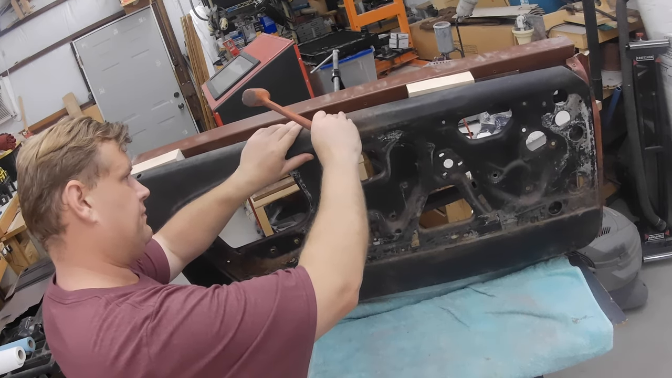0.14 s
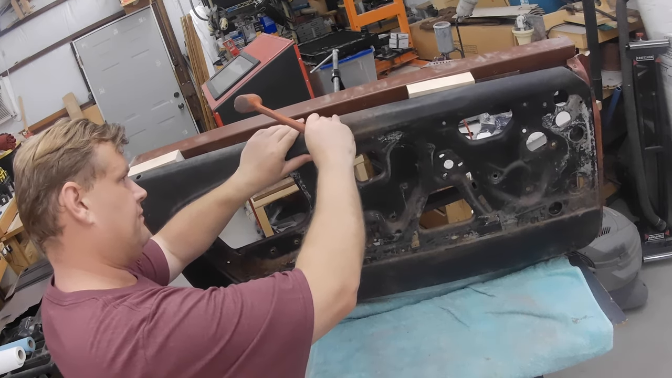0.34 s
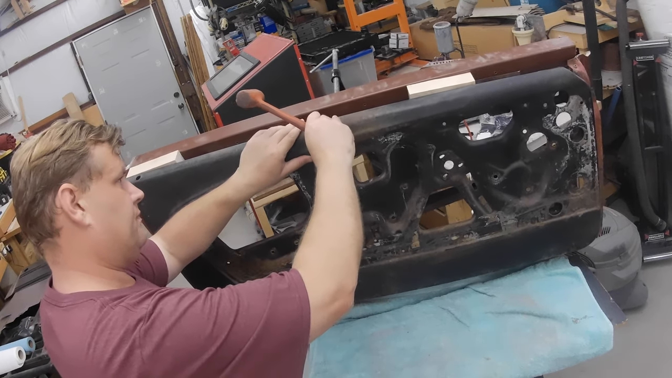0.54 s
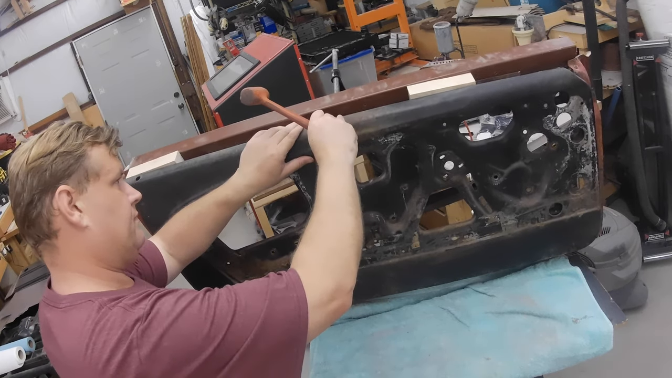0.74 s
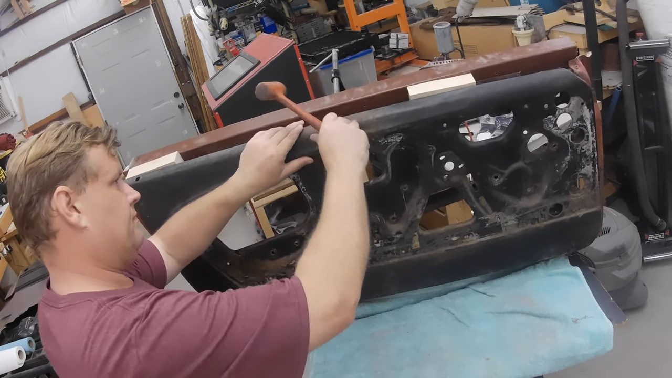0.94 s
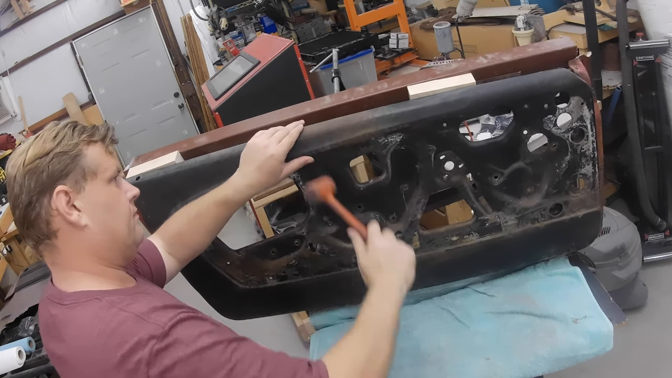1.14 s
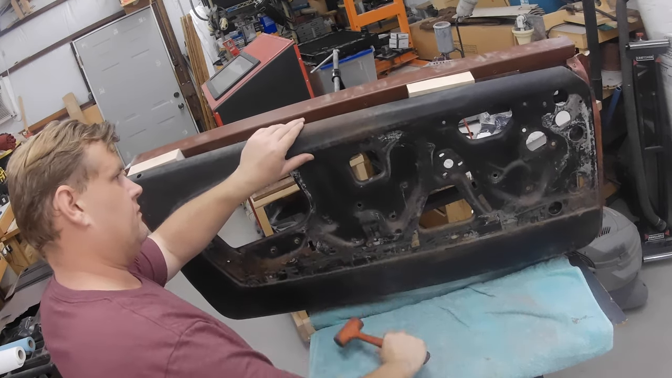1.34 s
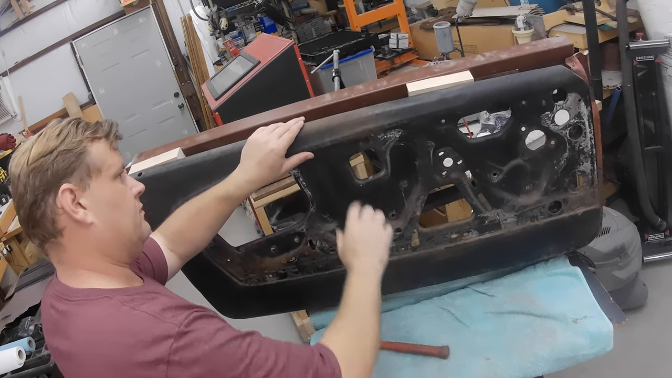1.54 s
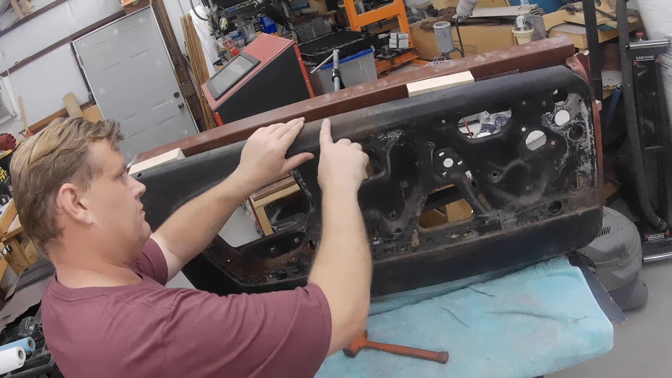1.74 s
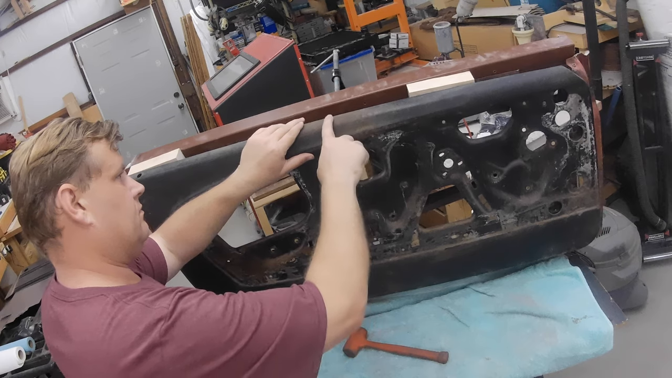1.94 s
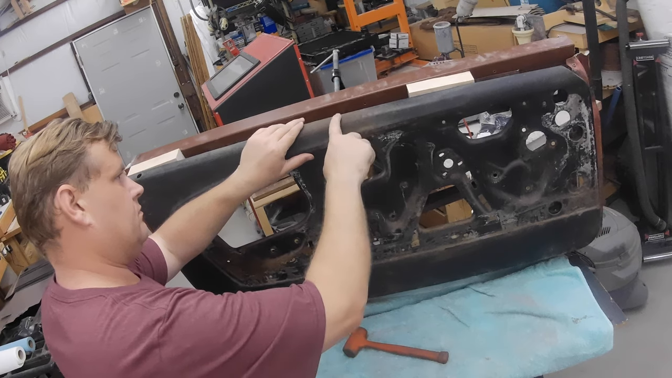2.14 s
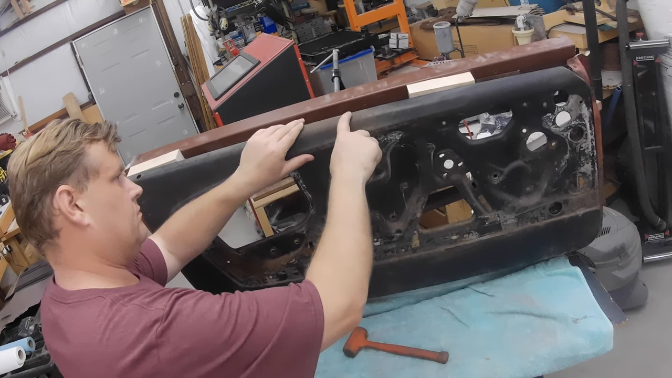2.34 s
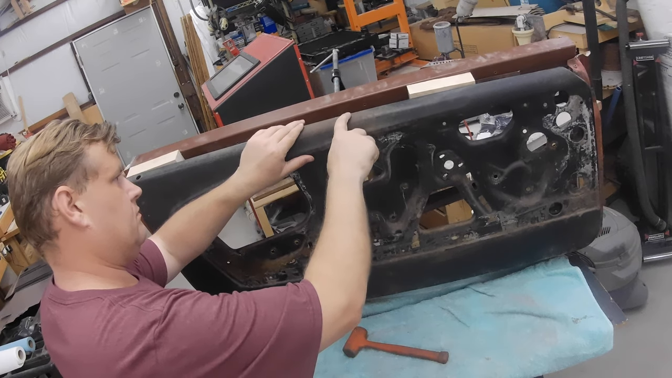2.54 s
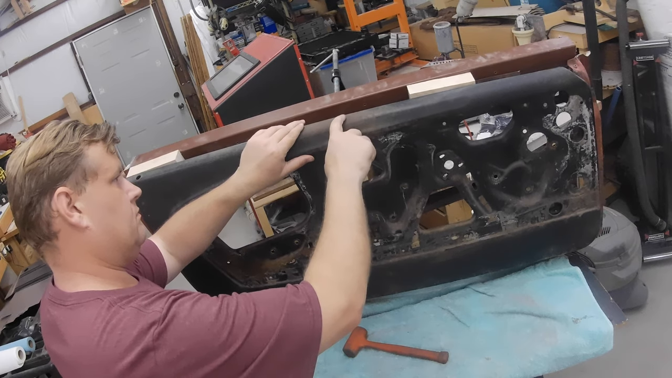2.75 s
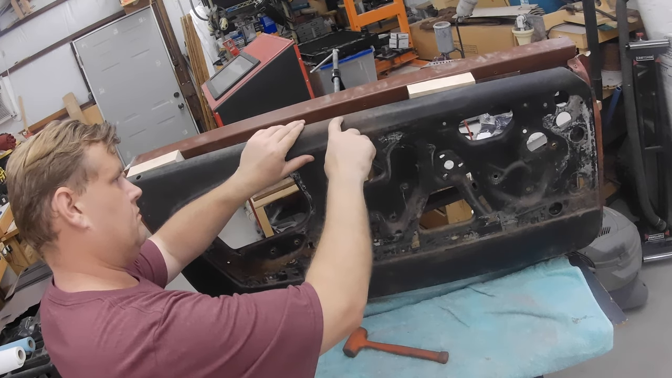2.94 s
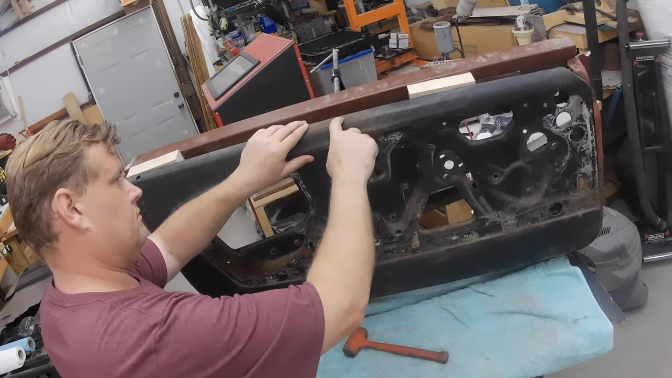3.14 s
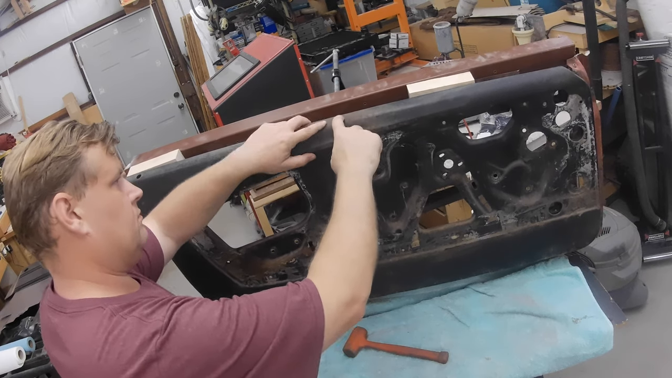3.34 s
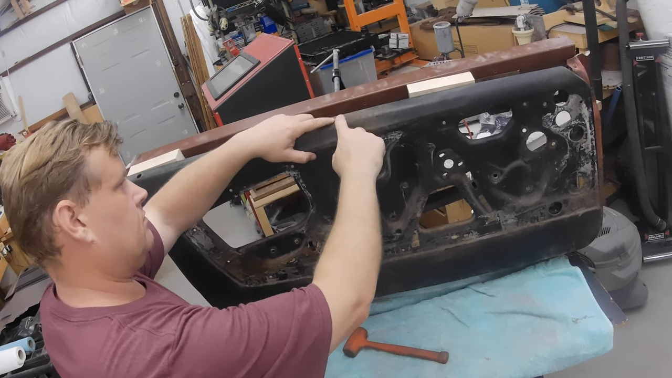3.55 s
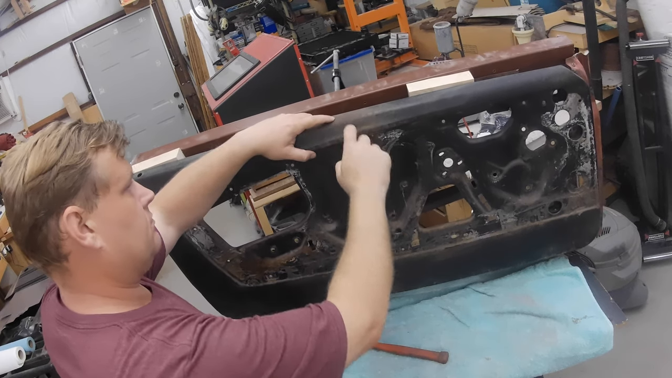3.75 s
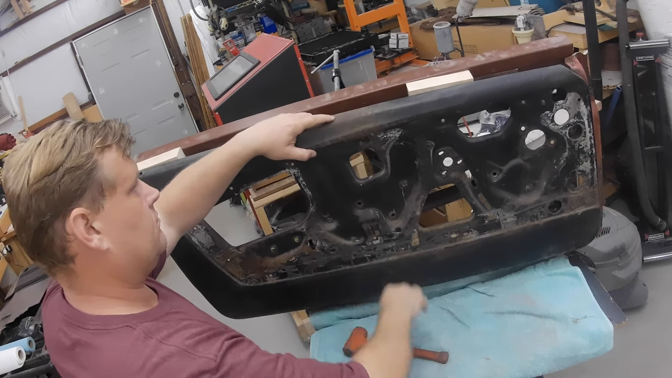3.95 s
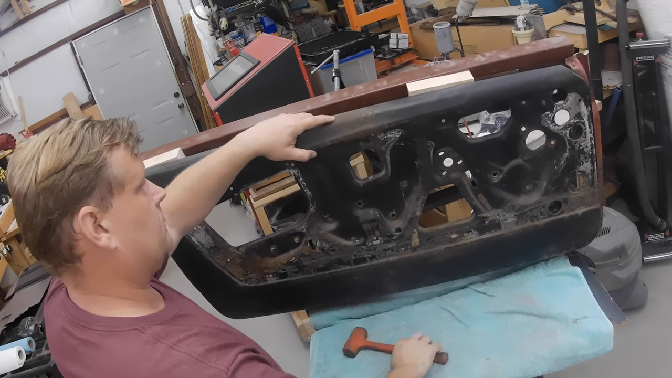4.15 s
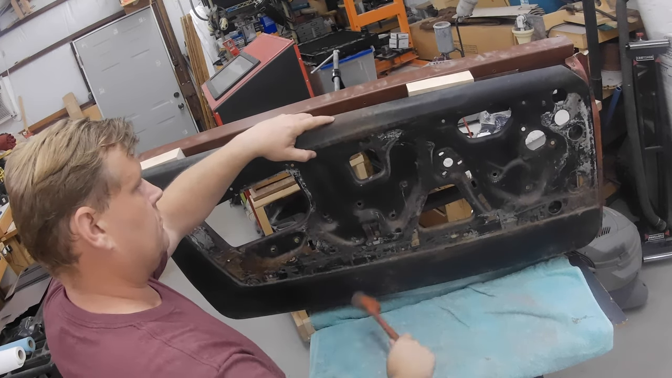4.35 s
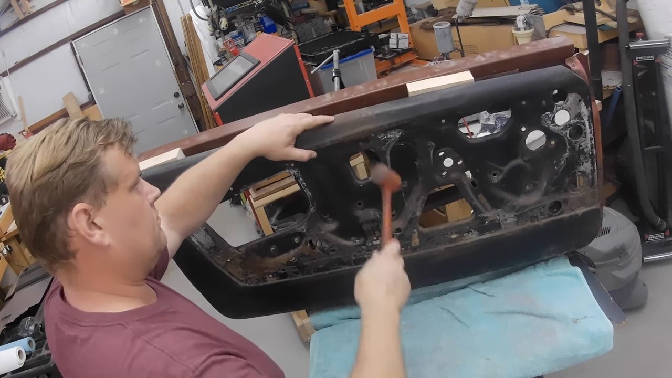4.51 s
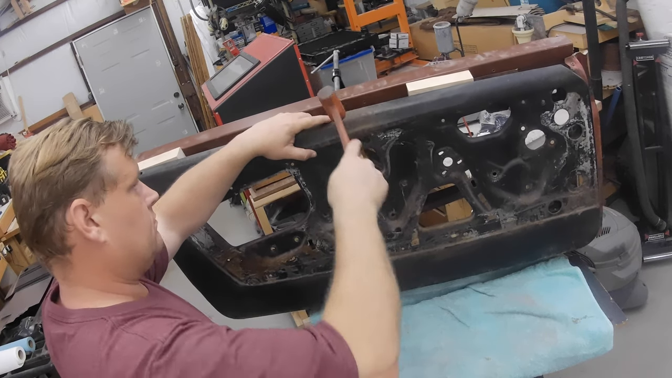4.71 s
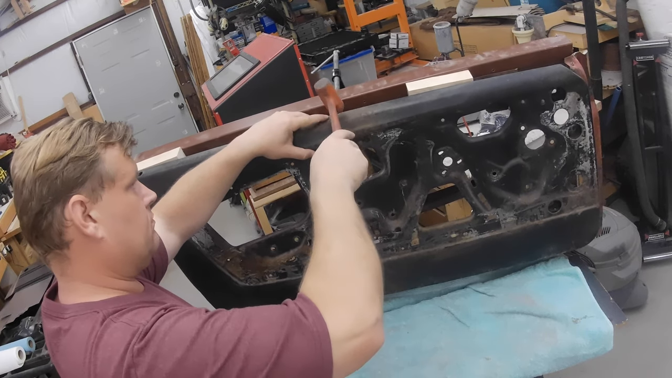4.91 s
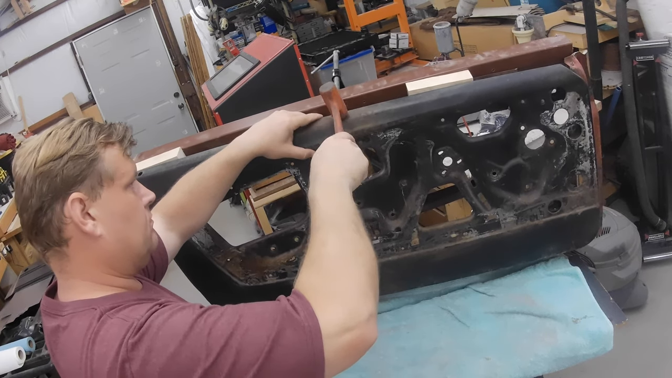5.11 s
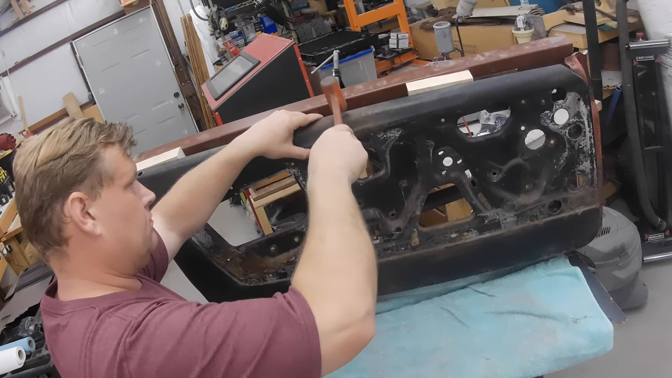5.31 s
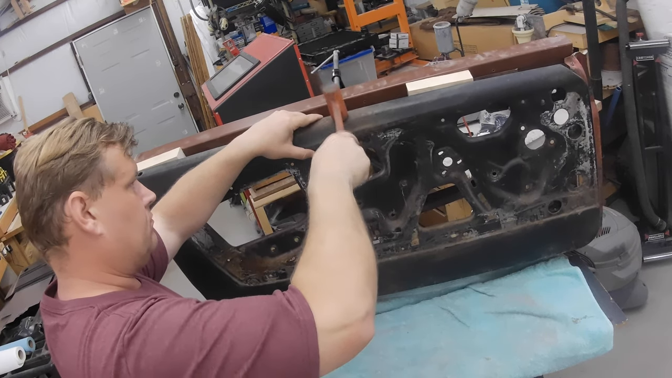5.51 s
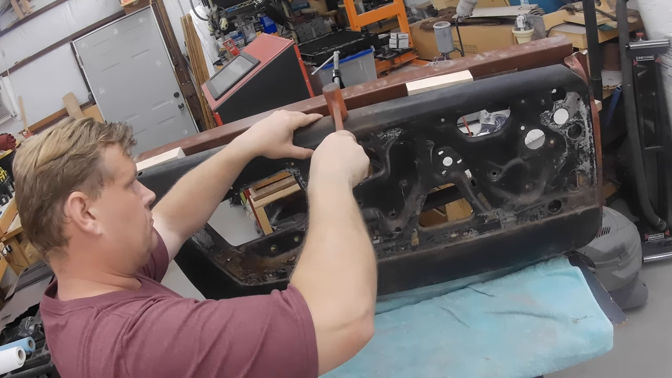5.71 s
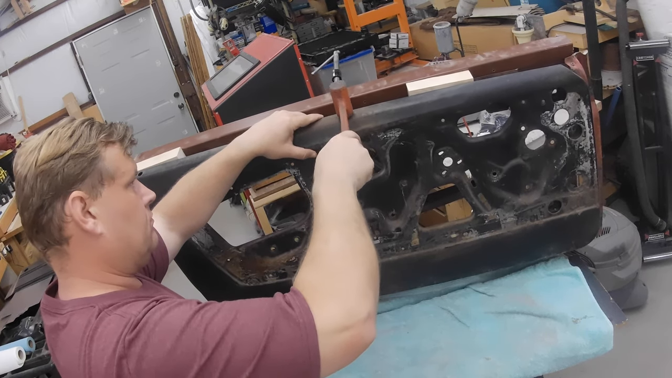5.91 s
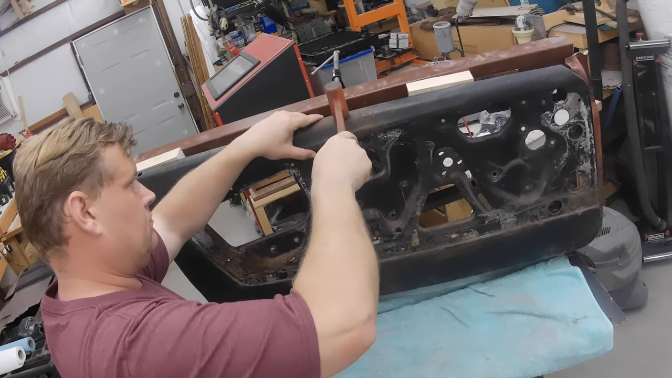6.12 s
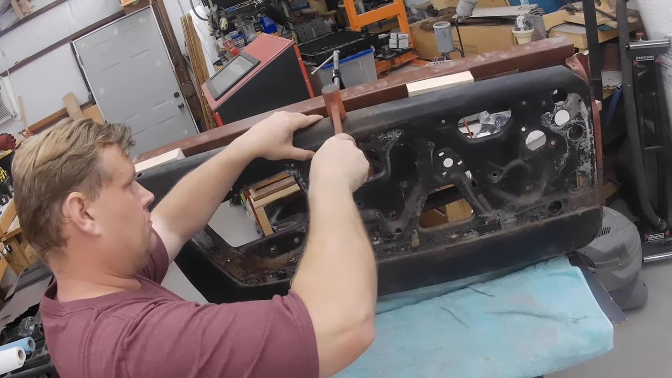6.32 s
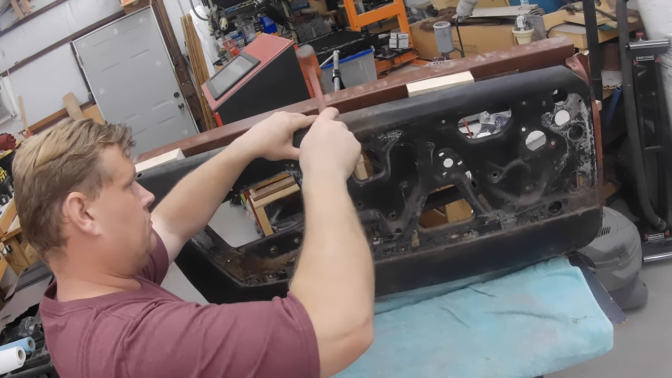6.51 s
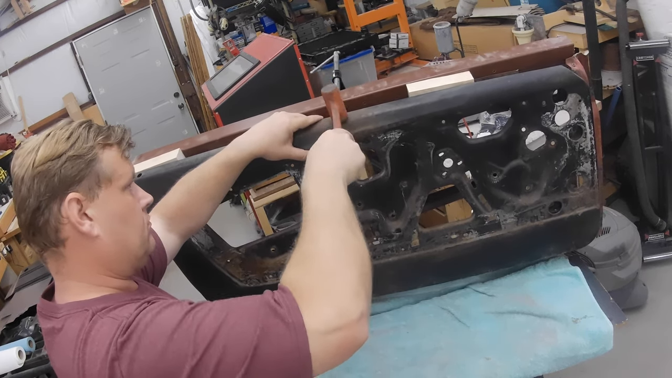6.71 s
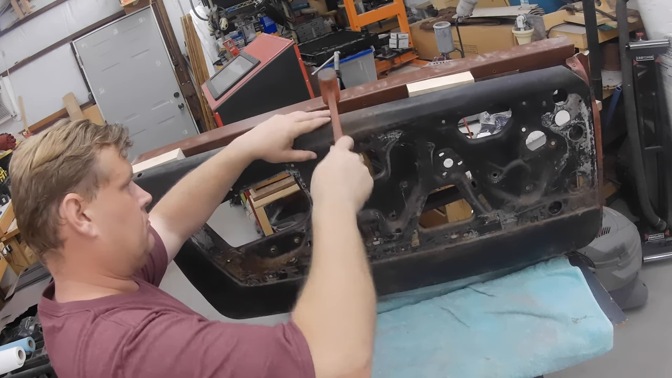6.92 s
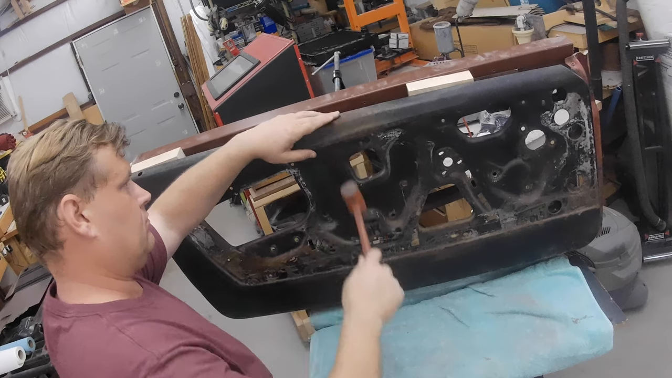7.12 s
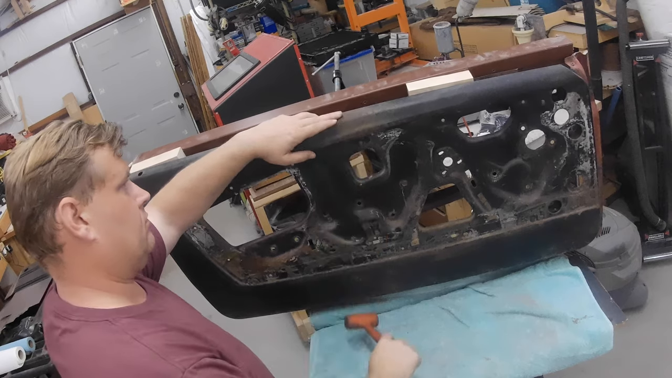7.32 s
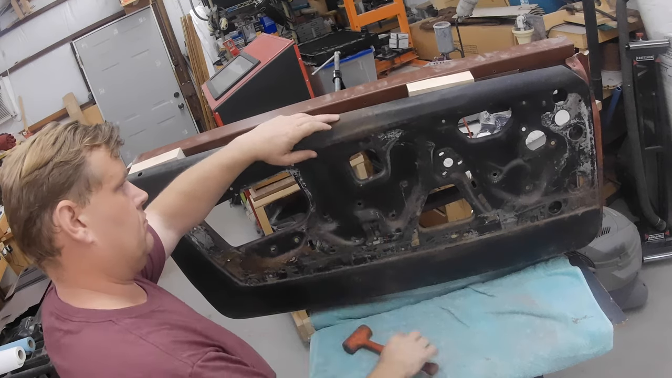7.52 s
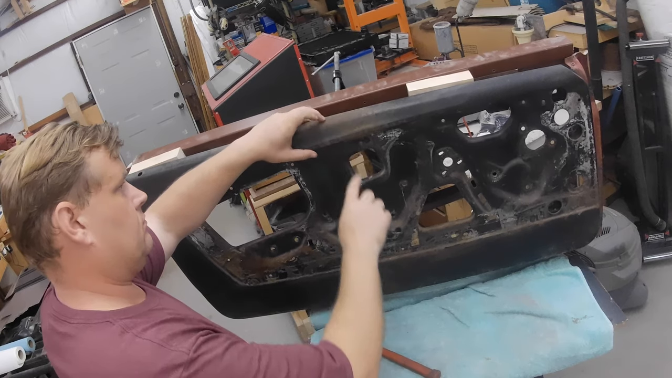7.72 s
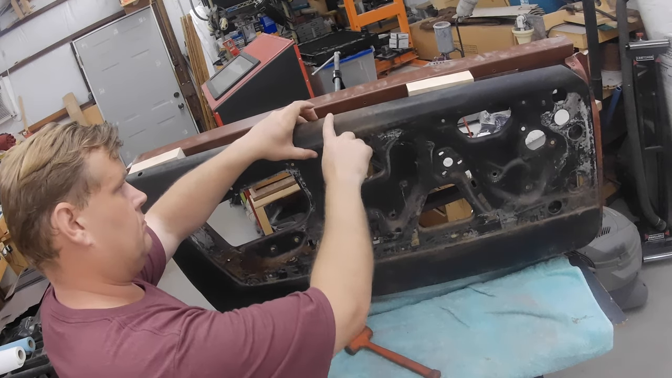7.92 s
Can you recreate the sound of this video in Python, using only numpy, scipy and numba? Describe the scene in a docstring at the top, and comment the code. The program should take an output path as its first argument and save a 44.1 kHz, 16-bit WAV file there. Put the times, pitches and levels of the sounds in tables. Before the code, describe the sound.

After five quiet seconds of fan hum and faint bench knocks, a hammer bangs hollow sheet steel twice, harshly overloading the close microphone.

```python
"""A hammer strikes a steel door panel twice in a garage workshop, close enough to overload the microphone.
The panel is a sum of decaying modes over a wash of decaying noise bands, and the room adds a weaker tail.
Light taps on it are softer, duller blows; knocks shake the resonances of a bench, and finger slides are
swells of band noise. A fan drones with blade and mains tones over rushing air, shaped from noise,
and a thin high hiss, a narrow noise band, throbs above it."""
import sys
import numpy as np
from scipy import signal
from scipy.fft import rfft, irfft
from scipy.io import wavfile
from scipy.ndimage import uniform_filter1d
from numba import njit

SR = 44100
rng = np.random.default_rng(int(sys.argv[2]) if len(sys.argv) > 2 else 0)


def field_ratio(decibels):
    """Amplitude ratio for a level in dB (20 dB per decade); scalars and array-likes work."""
    return 10 ** (np.asarray(decibels, dtype=float) / 20)


def output_pcm(signal):
    """Save a mono or channel-first signal as 16-bit PCM at the path in sys.argv[1].

    Samples are clipped to [-1, 1] before scaling.
    """
    pcm = np.clip(np.atleast_2d(signal).T, -1, 1) * 32767
    wavfile.write(sys.argv[1], SR, np.round(pcm).astype(np.int16))


N = 351168
T = np.arange(N) / SR


def noise():
    """White noise: equal mean power at every frequency."""
    return rng.standard_normal(N)


def unit(x):
    """Normalisation to an rms of 1."""
    return x / np.sqrt(np.mean(x ** 2))


def band(x, hz, width_hz):
    """Band-pass filtering about a geometric centre."""
    edges = np.sqrt(hz ** 2 + width_hz ** 2 / 4) + np.array([-0.5, 0.5]) * width_hz
    return signal.sosfilt(signal.butter(2, edges, "bandpass", fs=SR, output="sos"), x)


def walk(rate_hz):
    """Random wander: noise held in steps, smoothed twice, with a spread of about 1."""
    step = int(SR / rate_hz)
    steps = np.repeat(rng.standard_normal(N // step + 1), step)
    return unit(uniform_filter1d(uniform_filter1d(steps, step), step)[:N])


def fade(t, t60):
    """Exponential decay: 60 dB in t60 seconds."""
    return field_ratio(-60 * t / t60)


def add(out, start_s, x):
    """Superposition of x on out from start_s."""
    i = int(start_s * SR)
    out[i:i + len(x)] += x[:N - i]


# Hammer and lighter contacts on the panel. Each row: start in seconds, strength in dB,
# contact brightness (low-pass corner) in Hz, extra level of the low modes in dB.
PANEL_BLOWS = [(5.221, -37, 904, 0.5), (5.245, -33, 421, 7), (5.285, -43, 700, 3.5),
               (5.5848, 4, 9020, -0.4), (6.332, -46, 905, 10.5), (6.679, 4, 8990, 2.5)]


def panel():
    """Impact excitation: each blow rings modes and wash, and a softer contact excites less treble."""
    out, t = np.zeros(N), T[:int(1.5 * SR)]
    thin_hz = rng.uniform(1706, 7936, size=160)
    # the first waves are stronger until the skin of the door has shared them with its frame
    first_db, first_t60_s, rise_s = 5, 0.12, 0.00037
    for start_s, strength_db, bright_hz, low_db in PANEL_BLOWS:
        ring = named_modes(t, low_db)
        add(ring, 0, wash(t[:SR]))
        add(ring, 0, thin_sines(t[:SR], thin_hz))
        onset = 1 - np.exp(-t / rise_s)
        ring = ring * onset * (1 + field_ratio(first_db) * fade(t, first_t60_s))
        contact = signal.lfilter(*signal.butter(2, bright_hz, fs=SR), ring)
        add(out, start_s, field_ratio(strength_db) * contact)
    return out + room_tail(out)


# Separate modes of the panel. Each row: frequency in Hz, relative level in dB, decay time t60 in seconds.
PANEL_MODES = [(211.7, -33, 2.2), (219.7, -37, 1.5), (290, -33, 2.07), (364.2, -10, 0.35),
               (394.4, -23.5, 0.44), (406, -31, 1), (498, -21, 0.12), (587, -13.5, 0.27),
               (621.6, -23.5, .25), (730.2, -15.5, 0.34), (897, -25.5, 0.41), (1112, -15, 0.29),
               (1130.6, -12, 0.11), (1161, -17, 0.33), (1372, -21, 0.28), (1592, -17.5, .2),
               (2046, -26.5, 0.13)]


def named_modes(t, low_db):
    """Modal superposition: each mode is a decaying sinusoid of random phase."""
    hz, mode_db, t60 = np.transpose(PANEL_MODES)
    phase = rng.random(len(hz))
    modes = fade(t[:, None], t60) * np.sin(2 * np.pi * (hz * t[:, None] + phase))
    return modes @ field_ratio(mode_db + low_db * (hz < 330))


# Modes too dense to part. Each row: frequency in Hz, relative mean level in dB, typical t60 in seconds.
DENSE_MODES = [(139.3, -34.5, 0.17), (241.5, -26, 0.27), (397, -19.5, 0.35), (805.5, -11, 0.24),
               (1189, -10.5, .25), (1800, -23, 0.15), (2700, -29, 0.22), (3770, -20.5, 0.16),
               (5000, -26.5, 0.16), (6500, -40, .15), (8916, -35, 0.21), (14000, -46, .1)]


def wash_at(hz):
    """Interpolation of the wash over log frequency: level in dB and t60 in seconds."""
    table_hz, db, t60 = np.transpose(DENSE_MODES)
    return [np.interp(np.log(hz), np.log(table_hz), column) for column in (db, t60)]


def wash(t):
    """Statistical modal density: crowded modes act as noise decaying at its own rate in each band."""
    out, scatter_db, scatter_t60 = np.zeros(len(t)), 1.5, 0.08
    settle = 4096  # samples for the filter to settle
    for mid_hz in 140 * 2 ** np.arange(0, 6.8, 1 / 6):  # sixth-octave steps
        db, t60 = wash_at(mid_hz)
        chance = rng.standard_normal(2)  # chance scatter in each band's level and decay
        shape = field_ratio(db + scatter_db * chance[0]) * fade(t, t60 * np.exp(scatter_t60 * chance[1]))
        crowd = unit(band(rng.standard_normal(len(t) + settle), mid_hz, mid_hz / 8))[settle:]
        out += shape * crowd
    return out


def thin_sines(t, hz):
    """Additive synthesis: sparse random high sines, weaker than the wash and slower to fade."""
    db, t60 = wash_at(hz)
    sines = fade(t[:, None], 1.6 * t60) * np.sin(2 * np.pi * hz * t[:, None])
    return sines @ (field_ratio(db - 9.5) * rng.standard_normal(len(hz)))


def room_tail(x):
    """Reverberation by convolution: the walls return the sound as a weaker, longer tail."""
    level_db, t60_s, delay_s = -30, 0.85, 0.006
    t = T[:SR]
    walls = rng.standard_normal(SR) * fade(t, t60_s) * (t > delay_s)
    return field_ratio(level_db) * signal.fftconvolve(x, walls / np.sqrt(np.sum(walls ** 2)))[:N]


# Tool and hands on bench and door. Each row: start in seconds, strength in dB,
# pitch of the contact in Hz (heavy and soft is low, light and hard is high).
KNOCKS = [(1.473, -49, 1300), (1.6, -33, 108), (1.722, -45, 1250), (2.299, -52, 380), (4.059, -49.5, 290)]
# Broad resonances of the padded bench with the door on it. Each row: frequency in Hz, width in Hz,
# relative level in dB, t60 of the push in seconds.
BENCH_MODES = [(54.7, 25, 10, 0.65), (302, 170, 2.5, 0.25), (1120, 580, 0, 0.27), (1800, 970, -6, 0.17),
               (4000, 2000, -5, .08)]


def knocks():
    """Selective excitation: a knock favours the bench resonances nearest its contact pitch."""
    out, t = np.zeros(N), T[:SR // 2]
    fall_db_per_octave, rise_s = 5.5, 0.0015
    for start_s, strength_db, contact_hz in KNOCKS:
        for hz, width_hz, mode_db, t60 in BENCH_MODES:
            push = rng.standard_normal(len(t)) * fade(t, t60) * (1 - np.exp(-t / rise_s))
            octaves_away = abs(np.log2(hz / contact_hz))
            reach_db = strength_db + mode_db - fall_db_per_octave * octaves_away
            response = band(band(push, hz, width_hz), hz, width_hz)
            add(out, start_s, field_ratio(reach_db) * response / np.sqrt(width_hz / SR))
    return out


# Skin sliding on steel. Each row: start in seconds, length in seconds, level in dB before the swell,
# centre in Hz, width in Hz.
SLIDES = [(3.332, 0.22, -63.5, 4170, 1800), (5.201, 0.11, -60, 3100, 2400), (6.234, 0.23, -63, 3150, 2446),
          (7.74, 0.12, -65, 4000, 2000)]


def slides():
    """Friction noise: each slide is a short swell of band-limited noise."""
    out = np.zeros(N)
    for start_s, length_s, db, hz, width_hz in SLIDES:
        swell = np.hanning(int(length_s * SR))
        rub = band(band(rng.standard_normal(len(swell)), hz, width_hz), hz, width_hz)
        add(out, start_s, field_ratio(db) * swell * unit(rub))
    return out


# Fan blades and mains hum. Each row: frequency in Hz, level in dB about which it wavers.
FAN_TONES = [(18.7, -35), (93.5, -45), (119.8, -39.5), (187, -46), (238, -56.5), (374, -58.5), (560, -71),
             (815, -63.5), (1340, -76.5)]


def fan_tones():
    """Periodic tones, each a sinusoid whose level and phase waver slightly."""
    out = np.zeros(N)
    for hz, db in FAN_TONES:
        level = field_ratio(db + 1.5 * walk(14)) * np.sqrt(2)  # sqrt(2): from rms to peak
        cycles = hz * T + 0.044 * walk(4.0) + rng.random()
        out += level * np.sin(2 * np.pi * cycles)
    return out


# Spectrum of the rush of air. Each row: frequency in Hz, relative level in dB per Hz.
AIR_SPECTRUM = [(12, -6), (40, -4.5), (80, -1.8), (150, -6), (230, -13.5), (310, -19), (420, -12.5),
                (800, -19), (1550, -23), (2100, -36), (3000, -39), (3600, -36), (4800, -42), (5600, -51.5),
                (7500, -56.5), (10000, -68), (11200, -59.5), (13000, -80.5)]
# Room resonances that the rush of air excites. Each row: frequency in Hz, width in Hz, level in dB.
ROOM_BOOMS = [(55.6, 8, -44.5), (71.1, 5.4, -44.5), (184, 32, -52.5), (746, 84, -59)]


def fan_air():
    """Broadband flow noise: shaped noise with booms of the room as narrower noise bands."""
    f = np.maximum(np.fft.rfftfreq(N, 1 / SR), 1)
    hz, db = np.transpose(AIR_SPECTRUM)
    shape = field_ratio(np.interp(np.log(f), np.log(hz), db))
    air = unit(irfft(rfft(noise()) * shape, N))
    booms = sum(field_ratio(level_db) * unit(band(noise(), h, width)) for h, width, level_db in ROOM_BOOMS)
    return field_ratio(-42) * air + booms


def hiss():
    """Amplitude modulation: a narrow band of high noise throbs unevenly."""
    hz, width_hz, level_db, throb_hz, depth = 8764, 1100, -75, 30.7, 0.55
    throb = 1 + depth * np.cos(2 * np.pi * (throb_hz * T + 0.08 * walk(4)))
    narrow = band(band(noise(), hz, width_hz), hz, width_hz)
    return field_ratio(level_db + 2.5 * walk(25)) * throb * unit(narrow)


def scene():
    """Linear superposition of every source at one microphone."""
    return (panel() + knocks() + slides() + fan_tones() + fan_air() + hiss())[None]


@njit
def overload(x, chance, rail, depth, size, start_hz, end_hz, glide_s, last_s, cut_hz):
    """Clipping with feedback: the input stage steers its own offset to zero, which also cuts the deep bass;
    coming off a deep negative overload it flutters between the rails at a rising pitch."""
    y, armed, flutter, hz, phase, offset = np.empty(len(x)), False, 0., end_hz, 0., 0.
    for i in range(len(x)):
        u = x[i] - offset
        if u < -depth * rail:
            armed, flutter = True, 0.
        elif armed and u > -rail:
            armed, flutter, hz, phase = False, size, start_hz * (1 + chance[i]), 0.
        hz += (end_hz - hz) / (glide_s * SR)
        phase += 2 * np.pi * hz * (1 + chance[i]) / SR
        flutter = max(flutter - size / (last_s * SR), 0.)
        v = min(max(u, -rail), rail) + flutter * np.sin(phase)
        y[i] = min(max(v, -rail), rail)
        offset += 2 * np.pi * cut_hz / SR * y[i]
    return y


def gain_control(x, top_db, bass_db, treble_db, split_hz, attack_s, hold_s, release_s):
    """Level-dependent gain: turns down after anything loud, the treble more, holds, then comes back."""
    loud = 1. * (np.abs(x) > field_ratio(top_db))
    held = signal.fftconvolve(loud, np.ones(int(hold_s * SR)))[:N] > 0.5
    attack, release = 1 / (attack_s * SR), 1 / (release_s * SR)
    down = signal.lfilter([attack], [1, attack - 1], held)
    back = signal.lfilter([release], [1, release - 1], held)
    duck = np.where(held, down, back)
    bass = signal.lfilter(*signal.butter(1, split_hz, fs=SR), x)
    return bass * field_ratio(bass_db * duck) + (x - bass) * field_ratio(treble_db * duck)


def top_cut(x):
    """Nothing passes above the cut-off."""
    return signal.sosfilt(signal.butter(12, 15750, fs=SR, output="sos"), x)


def record(dry):
    """Signal chain in series: overload, low cut, gain control, then a steep treble limit."""
    low_cut_hz, top_hz = 50., 15700
    x = overload(dry[0], 0.2 * noise(), rail=0.92, depth=2.0, size=1.9, start_hz=8600., end_hz=10800.,
                 glide_s=0.00056, last_s=0.0011, cut_hz=low_cut_hz)
    x = signal.lfilter(*signal.butter(1, low_cut_hz, "highpass", fs=SR), x)
    x = gain_control(x, top_db=-9, bass_db=-1.5, treble_db=-5.5, split_hz=2000,
                     attack_s=0.15, hold_s=0.5, release_s=0.0054)
    x = signal.sosfilt(signal.ellip(8, 0.2, 70, top_hz, fs=SR, output="sos"), x)
    mix = np.clip(x, -1, 1)[None]
    return top_cut(mix)


dry = scene()
out = record(dry)
output_pcm(out)
```